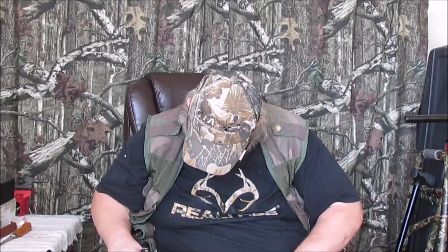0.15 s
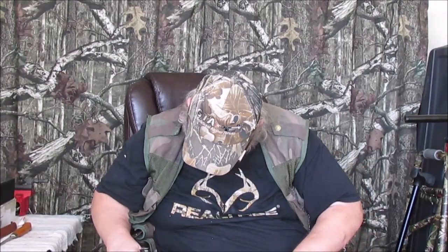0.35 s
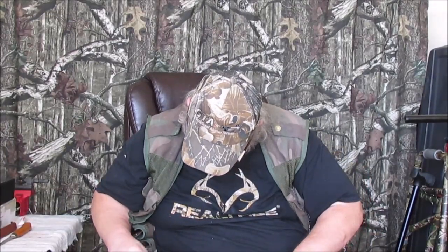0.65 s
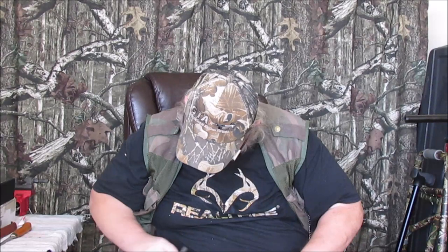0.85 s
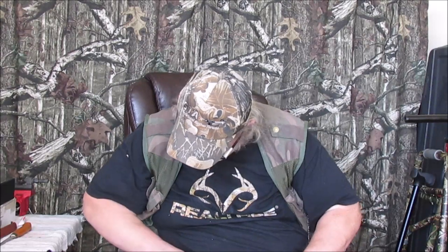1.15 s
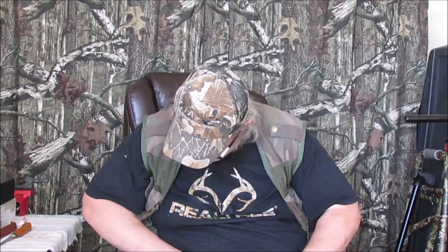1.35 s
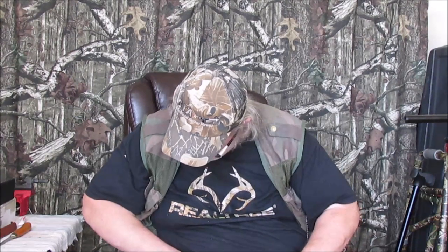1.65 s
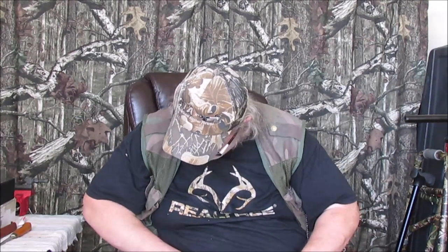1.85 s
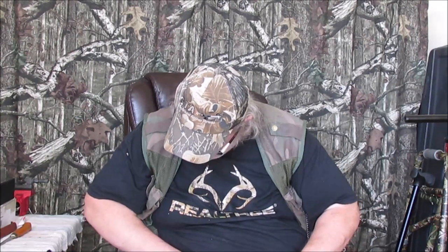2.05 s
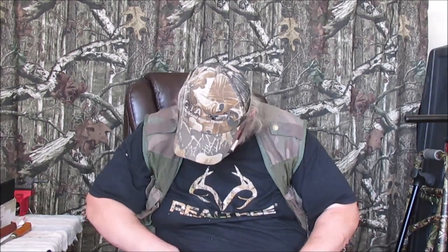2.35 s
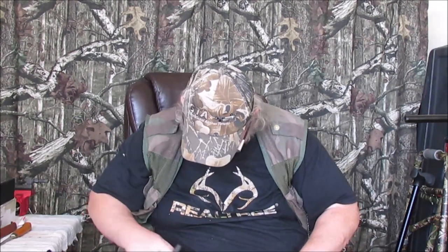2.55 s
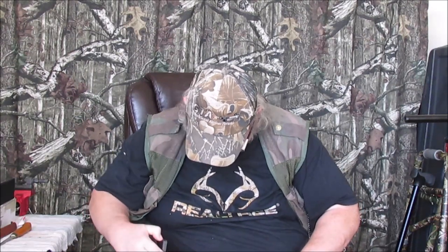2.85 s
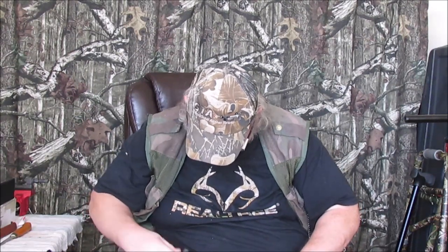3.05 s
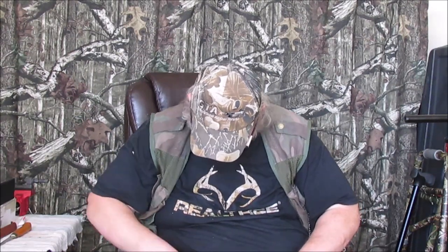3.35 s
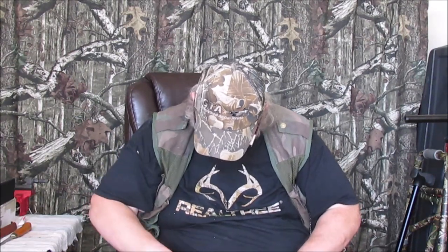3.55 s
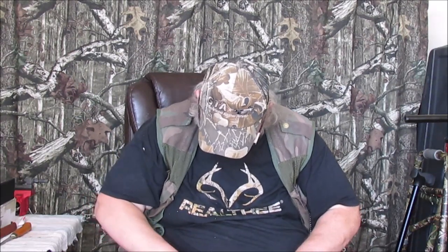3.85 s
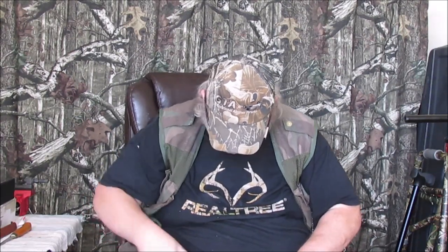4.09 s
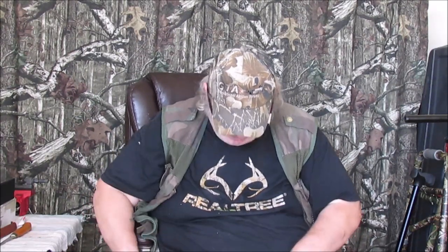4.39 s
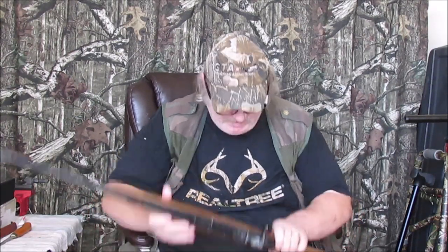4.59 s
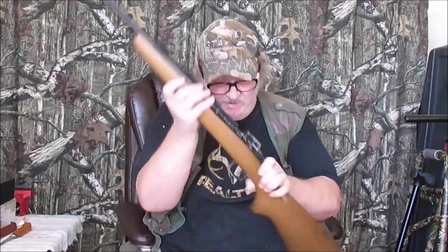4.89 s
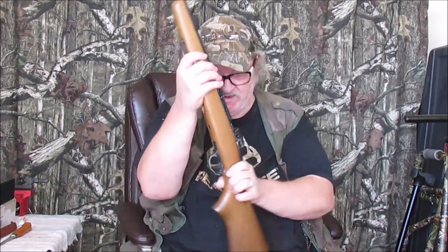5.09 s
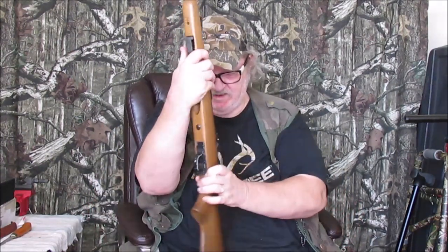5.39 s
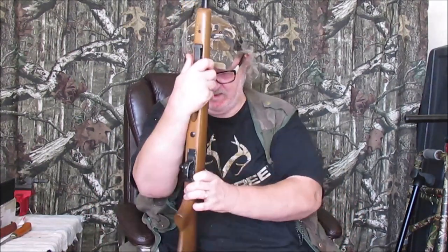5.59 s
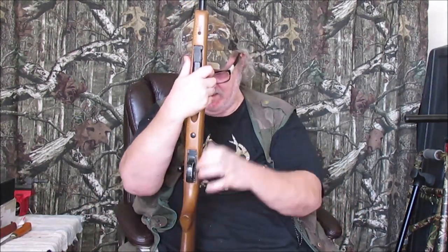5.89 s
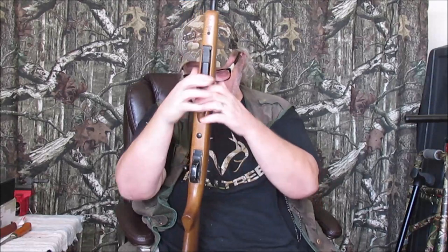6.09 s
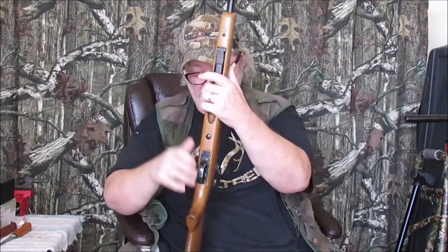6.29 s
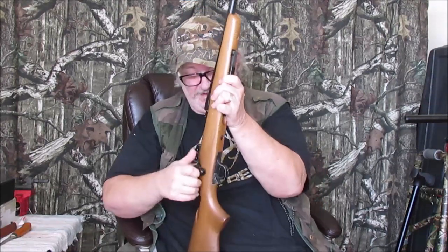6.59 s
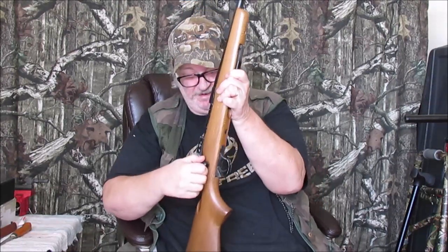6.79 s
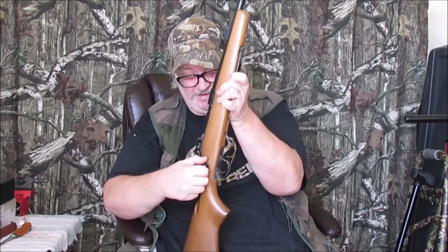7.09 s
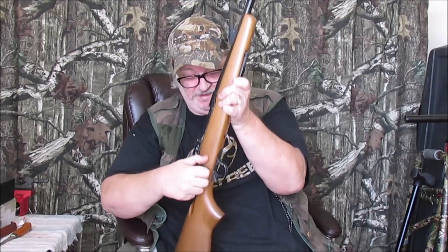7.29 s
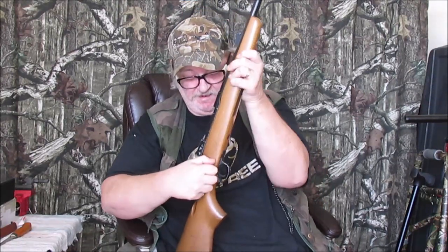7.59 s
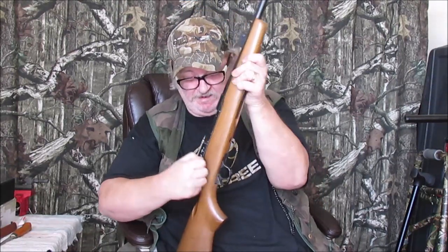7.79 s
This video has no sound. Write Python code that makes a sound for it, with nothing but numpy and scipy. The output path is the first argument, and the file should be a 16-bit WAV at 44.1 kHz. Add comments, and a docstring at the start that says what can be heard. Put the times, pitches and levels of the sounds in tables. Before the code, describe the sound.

Over a steady deep engine hum, soft thuds and small metal clicks lead to a sharp loud clack, then quieter bolt handling and a faint squeak.

```python
"""Air rifle worked beside an idling engine

An air rifle is worked by hand in a small room: struck steel rings in damped modes under a rattle of contacts,
parts and the wooden stock give short knocks of noise, and the sliding hand squeaks in two narrow noise bands.
A four-stroke engine throbs through the wall as crank harmonics in pulsing noise; mains gear buzzes as steady
tones, and dull thumps ring the floor in low modes. A soft hiss of shaped noise gives faint rustling and the
late noisy tail of the loud snap. A small camera with two close microphone ports and gain control picks it up."""
import sys
import numpy as np
from scipy import signal
from scipy.fft import rfft, irfft, next_fast_len
from scipy.io import wavfile
from scipy.ndimage import uniform_filter1d

SR = 44100
rng = np.random.default_rng(int(sys.argv[2]) if len(sys.argv) > 2 else 0)


def transcribe(u):
    """Save the signal u as a 16-bit wav file named by the first command-line argument.

    u: samples, shape (n,) or (channels, n), limited to [-1, 1]; the rate is SR.
    q: integer samples, one column per channel.
    """
    v = np.clip(np.atleast_2d(u).T, -1, 1)
    q = np.round(v * 32767).astype(np.int16)
    wavfile.write(sys.argv[1], SR, q)


N = 350154

# Wide engine and room noise spectrum: frequency_hz, relative density_db (dB per Hz)
AIR_SPECTRUM = [(25, -30), (55, 0.5), (140, -1), (220, -6.5), (330, -8), (500, -10.5), (800, -11.5),
                (1250, -16.5), (1700, -16), (2200, -23), (2800, -30.5), (5000, -36), (6800, -30.5),
                (15800, -50.5)]
AIR_DB = -45.5  # rms before pulse, swell and port tilt
# Mains tones: frequency_hz, level_db (rms before slow drift)
MAINS_TONES = [(120, -62), (239.9, -53.5)]
# Engine crank speed: time_s, speed_rpm
CRANK_SPEED = [(0.0, 807.5), (1.0, 807.64), (2.0, 808.65), (3.5, 808.16), (5.0, 809.08), (6.5, 808.86),
               (7.94, 807.78)]
# Engine tones: order (multiple of crank speed), level_db (rms before slow drift).
# Half orders come from firing every second turn.
CRANK_ORDERS = [(2.0, -66.6), (3.0, -59.8), (4.0, -49.9), (5.0, -46.5), (5.5, -55.5), (6.0, -30.9),
                (6.5, -56.3), (7.0, -41.0), (8.0, -55.2), (9.0, -53.2), (10.5, -64.1), (11.0, -53.4),
                (11.5, -63.8), (12.0, -45.4), (12.5, -46.9), (13.0, -48.1), (13.5, -63.5), (14.0, -56.3),
                (14.5, -62.3), (15.0, -59.2), (16.0, -66.7), (19.0, -65.8), (21.0, -66.0), (24.0, -63.4)]
# Resonances rung by each exhaust beat: frequency_hz, width_hz
EXHAUST_RESONANCES = [(82, 6), (168, 7)]
BEAT_TURN = .359  # place of the beat in the turn
HALF_LEAD_RAD = 1.2  # lead of the strong-weak pattern over the beat
# Pushes on the floor: start_s, level_db, upper_db (added to the upper two modes)
THUMPS = [(.168, -26.5, 2.5), (.776, -33, -1), (1.34, -29, 2), (2.008, -33, 6), (2.64, -35, -5),
          (3.355, -39, 3), (3.389, -35, 2), (3.43, -46, 5)]
# Floor modes: frequency_hz, relative level_db, t60_s
FLOOR_MODES = [(53, 5.5, 0.43), (93.3, 1.5, 0.23), (140, -6, 0.13)]
# Soft hiss, faint rustling and late tail of the loud snap: time_s, level_db
HISS_LEVEL = [(0.0, -64), (0.57, -71), (0.821, -62), (1.24, -64), (1.7, -66), (3.07, -68.5), (3.9, -58.5),
              (4.25, -68.5), (4.71, -64.5), (5.57, -61.5), (5.79, -75), (5.97, -64.5), (7.01, -64),
              (7.94, -73)]
# Soft hiss spectrum: frequency_hz, relative density_db (dB per Hz)
HISS_SPECTRUM = [(800, -29.5), (2000, 4.5), (4000, 6), (7000, 1), (11000, -1.5), (15800, -5.5)]
# Background noise at the two ports: frequency_hz, likeness (-1 to 1)
PORT_LIKENESS = [(60, 1.0), (110, 1.0), (200, 0.93), (380, -0.12), (700, -0.32), (1290, -0.06),
                 (2380, 0.34), (4400, 0.82), (8120, 0.54), (15000, 0.14)]
# Background balance of the ports: frequency_hz, left_minus_right_db
PORT_TILT = [(60, 0.0), (110, 0.0), (200, 1.0), (380, -1.0), (700, -2.5), (1290, -2.0), (2380, -1.5),
             (4400, -0.5), (8120, -0.5), (15000, 0.5)]
# Squeak of the hand on the bolt: frequency_hz, base level_db, slip_db (added at the loudest slip), fade_db_per_s
SQUEAK_BANDS = [(1640, -69, 15, 0.), (3200, -65, 1, -26)]
SQUEAK_START_S, SQUEAK_LENGTH_S, SQUEAK_PEAK_S = 6.62, .52, .14  # the peak counts from the start
# Blows on the rifle: start_s, steel_db, treble_db (tilt of the steel), knock_db, knock_hz
BLOWS = [(0.861, -56, -7, -46, 474), (1.087, -44.5, -3, -48.5, 1990), (1.092, -60, -11, -53, 3580),
         (1.457, -52, -7.5, -43, 530), (2.051, -66, -13, -49.5, 660), (3.209, -56, -8, -48.5, 840),
         (3.239, -35.5, 1, -44.5, 1330), (3.699, -21, 0.5, -25, 1090), (3.704, -20, 4.5, -34, 2060),
         (4.519, -69, 4, -50, 352), (6.341, -50.5, -2, -48, 885), (6.38, -50, -3, -48, 587),
         (6.483, -68, -5, -49.5, 295), (6.512, -60, -7, -41, 262), (6.54, -68, -7, -54, 295),
         (6.74, -49.5, -5, -50, 444), (7.419, -58.5, 2, -58, 590), (7.892, -47.5, 3, -42, 1370),
         (7.896, -66, 1, -52, 2980)]
# Modes of action and barrel: frequency_hz, relative level_db (before colouring), t60_s
STEEL_MODES = [(867, -3, .07), (940, -5, .06), (1085, -5, .06), (1142, -2, .09), (1430, -3, .07),
               (1695, -7, .06), (1922, -7, .08), (2062, -2, .18), (2140, -4, .14), (2234, -5, .12),
               (3100, -10, .05), (3500, -9, .06), (4240, -7, .1), (4328, -4, .16), (4452, -2, .16),
               (4600, -6, .1), (5281, -14, .09), (6652, -7, .13), (7027, -6, .09), (7477, -8, .08),
               (8118, -4, .1), (8393, -4, .1), (8580, -4, .1), (9185, -5, .09), (9400, -3, .1),
               (9470, 0, .12), (10020, -9, .09), (10900, -9, .08), (12150, -1, .13)]
# Colouring of ring and rattle: frequency_hz, gain_db
STEEL_COLOUR = [(120, -56), (700, -10), (900, 0.5), (1300, 2), (2150, -1), (3000, -6.5), (4400, -8.5),
                (5400, -11), (6800, -3.5), (9000, -7), (11500, -13.5), (16000, -19)]
RING_ROUGHNESS = .6
TREBLE_PIVOT_HZ = 4100
RING_DB, RING_PER_DB = 6, .5  # ring over rattle at a 0 dB blow, and its rise per dB of steel level
RATTLE_DECAY_S, KNOCK_DECAY_S = .012, .01  # times to fall to 1/e
KNOCK_FALL_DB, KNOCK_SHARPENING = -24, .7  # fall one octave off a 1 kHz knock; power law with pitch
# Decay of the echoes: frequency_hz, t60_s
ROOM_DECAY = [(300, 0.39), (1000, 0.23), (2200, 0.33), (5000, 0.29), (9000, 0.28), (15000, 0.21)]
# Echoes at the two ports: frequency_hz, likeness (-1 to 1)
ECHO_LIKENESS = [(60, 1.0), (130, 0.96), (290, 0.44), (640, 0.45), (1410, 0.42), (3100, 0.66), (6820, 0.71),
                 (15000, 0.25)]
# Rifle balance of the ports: frequency_hz, left_minus_right_db
RIFLE_TILT = [(60, 0.0), (110, 0.0), (200, 1.0), (380, -2.5), (700, -6.5), (1290, -3.0), (2380, 0.0),
              (4400, 0.0), (8120, 0.5), (15000, 1.0)]
BAND_EDGE_HZ = 15850


def gain_of(db):
    """Decibel law: twenty decibels are a factor of ten in amplitude."""
    return 10 ** (np.asarray(db) / 20)


def evened(x):
    """Normalization to unit root-mean-square amplitude."""
    return x / np.sqrt(np.mean(x ** 2) + 1e-20)


def read(points, hz):
    """Linear interpolation over a logarithmic frequency axis."""
    f, value = np.transpose(points)
    return np.interp(np.log(hz + 1), np.log(f + 1), value)


def add(mix, start_s, sound):
    """Superposition: a sound adds to the pressure already present."""
    part = mix[..., round(start_s * SR):][..., :sound.shape[-1]]
    part += sound[..., :part.shape[-1]]


def wander(hz):
    """Slow fluctuation of rms 1, as a sum of sines of random phase up to hz."""
    t = np.arange(0, N + 256, 256) / SR
    rates = np.geomspace(hz / 20, hz, 20)
    slow = sum(np.sin(2 * np.pi * (f * t + rng.random())) / np.sqrt(f) for f in rates)
    return np.interp(np.arange(N) / SR, t, evened(slow))


def noise(spectrum, patchy_db):
    """Partial coherence: the ports share part of a coloured noise with drifting patches."""
    frames, hz = N // 256 + 5, np.fft.rfftfreq(1024, 1 / SR)
    a, b, c, d, patches = rng.standard_normal((frames, 513, 5)).T
    patches = uniform_filter1d(patches, size=12, axis=0)
    patches = evened(uniform_filter1d(patches, size=12, axis=1))
    same = np.clip(read(PORT_LIKENESS, hz), -1, 1)[:, None]
    left, own = a + 1j * b, c + 1j * d
    z = np.array([left, same * left + np.sqrt(1 - same ** 2) * own])
    z *= gain_of(read(spectrum, hz)[:, None] + patchy_db * patches)
    return evened(signal.istft(z, nperseg=1024, noverlap=768)[1][:, :N])


def causal(x, points):
    """Minimum-phase filtering: the phase follows from the log gain, so nothing smears backwards."""
    log_gain = np.log(gain_of(read(points, abs(np.fft.fftfreq(2048, 1 / SR)))))
    taps = np.fft.ifft(np.exp(np.conj(signal.hilbert(log_gain)))).real[:1024]
    return signal.fftconvolve(x, taps)[:len(x)]


def ports(pair, tilt):
    """Level difference between ports: half the tilt raises the left port, half lowers the right."""
    size = next_fast_len(N)
    half = gain_of(read(tilt, np.fft.rfftfreq(size, 1 / SR)) / 2)
    return irfft(rfft(pair, size) * np.array([half, 1 / half]), size)[:, :N]


def crank():
    """Phase as the integral of speed: turns of the crank, zero at the first beat."""
    rpm = np.interp(np.arange(N) / SR, *np.transpose(CRANK_SPEED))
    return np.cumsum(rpm) / SR / 60 - BEAT_TURN


def air():
    """Amplitude modulation: wide engine and room noise pulses a little with each crank turn."""
    pulse_db = 1.0 * np.cos(2 * np.pi * (crank() - .68))
    swell_db = .5 * wander(hz=3)
    return gain_of(AIR_DB + pulse_db + swell_db) * noise(AIR_SPECTRUM, patchy_db=1)


def mains():
    """Harmonic hum: tones at twice and four times the mains rate, with slight level drift."""
    t = np.arange(N) / SR
    out = np.zeros(N)
    for hz, db in MAINS_TONES:
        level = gain_of(db + .6 * wander(hz=3))
        out += np.sqrt(2) * level * np.sin(2 * np.pi * hz * t)
    return out


def engine():
    """Fourier series of a periodic source: crank orders phased as one beat ringing two resonances."""
    turns, out = crank(), np.zeros((2, N))
    for order, db in CRANK_ORDERS:
        hz = order * CRANK_SPEED[0][1] / 60
        responses = [f ** 2 - hz ** 2 + 1j * hz * width for f, width in EXHAUST_RESONANCES]
        ring_rad = np.angle(-1 / np.prod(responses))
        # Long waves reach both ports almost alike; the right one departs as pitch rises.
        port_rad = np.array([[0], [(hz / 310) ** 2]])
        port_loss_db = 1.2 * np.minimum(port_rad / .3, 1)
        level = gain_of(db + .7 * wander(hz=5) - port_loss_db)
        half_rad = HALF_LEAD_RAD * (order % 1 > 0)
        out += np.sqrt(2) * level * np.cos(2 * np.pi * order * turns + ring_rad + port_rad + half_rad)
    return out


def thump(db, upper_db):
    """Modal excitation: a soft push rings the damped modes of the floor boards."""
    t = np.arange(SR // 2) / SR
    ring = np.zeros(len(t))
    for hz, mode_db, t60 in FLOOR_MODES:
        level_db = mode_db + upper_db * (hz > 70) - 60 * t / t60
        ring += gain_of(level_db) * np.sin(2 * np.pi * hz * t)
    return gain_of(db) * ring * np.minimum(t / .024, 1)  # rise in seconds


def soft_hiss():
    """Shaped noise under a level curve: faint rustling, and the late noisy tail of the loud snap near 3.9 s."""
    level_db = np.interp(np.arange(N) / SR, *np.transpose(HISS_LEVEL))
    return gain_of(level_db + 1.2 * wander(hz=25)) * noise(HISS_SPECTRUM, patchy_db=1)


def squeak():
    """Stick-slip friction: uneven slips as broken noise in two narrow resonances, one slip stronger."""
    t = np.arange(0, SQUEAK_LENGTH_S, 1 / SR)
    slip = np.exp(-abs(t - SQUEAK_PEAK_S) / 0.024)
    broken_db = 3 * wander(hz=40.6)[:len(t)]
    out = np.zeros(len(t))
    for hz, db, slip_db, fade_db in SQUEAK_BANDS:
        band = signal.butter(2, [hz * .95, hz * 1.05], "band", fs=SR)
        hiss = evened(signal.lfilter(*band, rng.standard_normal(len(t))))
        out += gain_of(db + slip_db * slip + fade_db * t + broken_db) * hiss
    return out * signal.windows.tukey(len(t), .2)


def room(x):
    """Reverberation: sparse echoes of random sign, partly shared by the ports, decay band by band."""
    taps = np.zeros((2, SR))
    at = np.arange(160, SR - 20, 20) + rng.integers(0, 20, (2, (SR - 161) // 20))
    np.put_along_axis(taps, at, rng.choice([-1., 1.], at.shape), 1)
    hz, t, z = signal.stft(taps, SR, nperseg=256)
    same = np.clip(read(ECHO_LIKENESS, hz), -1, 1)[:, None]
    z = np.array([z[0], same * z[0] + np.sqrt(1 - same ** 2) * z[1]])
    decay = gain_of(-60 * t / read(ROOM_DECAY, hz)[:, None])
    tail = signal.istft(z * decay, SR, nperseg=256)[1]
    return signal.fftconvolve(x[None], tail / np.linalg.norm(tail[0]), axes=1)[:, :N]


def steel_ring(t):
    """Modal synthesis: damped modes of action and barrel, roughened by parts rattling on them."""
    draw = rng.random((len(STEEL_MODES), 2))
    hz, mode_db, t60 = np.transpose(STEEL_MODES)[:, :, None]
    struck_db = mode_db + 3 * draw[:, 1:]  # each blow wakes the modes unevenly
    loose = rng.standard_normal((len(STEEL_MODES), len(t)))
    loose = evened(uniform_filter1d(loose, size=300, axis=1))
    envelope = gain_of(struck_db - 60 * t / t60) * (1 + RING_ROUGHNESS * loose)
    return (envelope * np.sin(2 * np.pi * (hz * t + draw[:, :1]))).sum(0)


def blow(steel_db, treble_db, knock_db, knock_hz):
    """Impact excitation: a tick rings steel under a dying rattle, and the part struck gives a short knock."""
    rise_s = 0.0003 * gain_of(-.9 * (max(steel_db, knock_db) + 21.5))  # gentle blows start softly
    t = np.arange(SR // 3) / SR
    start = np.minimum(t / rise_s, 1)
    ring = steel_ring(t)
    # Tiny contacts: weak noise with sparse stronger hits
    contacts = rng.standard_normal(len(t)) * (0.26 + (rng.random(len(t)) < .1))
    rattle = evened(contacts * np.exp(-t / RATTLE_DECAY_S))
    steel = gain_of(RING_DB + RING_PER_DB * steel_db) * evened(ring) + rattle
    colour = [(f, db + treble_db * np.tanh(2 * np.log(f / TREBLE_PIVOT_HZ))) for f, db in STEEL_COLOUR]
    steel = causal(steel * start, colour)
    # Higher knocks have a narrower hump, given here by octave offset.
    fall_db = KNOCK_FALL_DB * (knock_hz / 1000) ** KNOCK_SHARPENING
    octaves = np.linspace(-3, 3, 37)
    hump = [(knock_hz * 2. ** k, max(fall_db * abs(k) ** 1.5, -60)) for k in octaves]
    knock = causal(contacts * np.exp(-t / KNOCK_DECAY_S) * start, hump)
    # Levels are the rms of the first 900 samples, about 20 ms.
    steel *= gain_of(steel_db) / np.sqrt(np.mean(steel[:900] ** 2))
    knock *= gain_of(knock_db) / np.sqrt(np.mean(knock[:900] ** 2))
    return steel + knock


def scene():
    """Linear superposition of background, floor and rifle with its echoes at the two ports."""
    rifle, floor = np.zeros(N), np.zeros(N)
    for start_s, *settings in BLOWS:
        add(rifle, start_s, blow(*settings))
    add(rifle, SQUEAK_START_S, squeak())
    for start_s, *settings in THUMPS:
        add(floor, start_s, thump(*settings))
    near = ports(rifle + gain_of(0.04) * room(rifle), RIFLE_TILT)
    background = ports(air() + soft_hiss(), PORT_TILT) + engine() + mains()
    return background + floor + near


def record(dry):
    """Dynamic compression: gain dips at the loud snap and creeps back; a low-pass then limits the band."""
    power_db = 10 * np.log10(abs(uniform_filter1d((dry ** 2).mean(0), size=900)) + 1e-12)
    # The held peak level sinks 10.2 dB a second; gain follows a fraction of its excess.
    fall_db = np.arange(N) * 10.2 / SR
    held_db = np.maximum.accumulate(power_db + fall_db) - fall_db
    over_db = np.maximum(held_db + 27.5, 0)  # threshold -27.5 dB
    keep = np.exp(-1 / (0.019 * SR))  # smoothing time 19 ms
    dip_db = signal.lfilter([1 - keep], [1, -keep], 0.37 * over_db)
    ducked = dry / gain_of(dip_db)
    low_pass = signal.firwin(511, BAND_EDGE_HZ, window=("kaiser", 9), fs=SR)
    return signal.oaconvolve(ducked, low_pass[None], "same")


dry = scene()
out = record(dry)
transcribe(out)
```